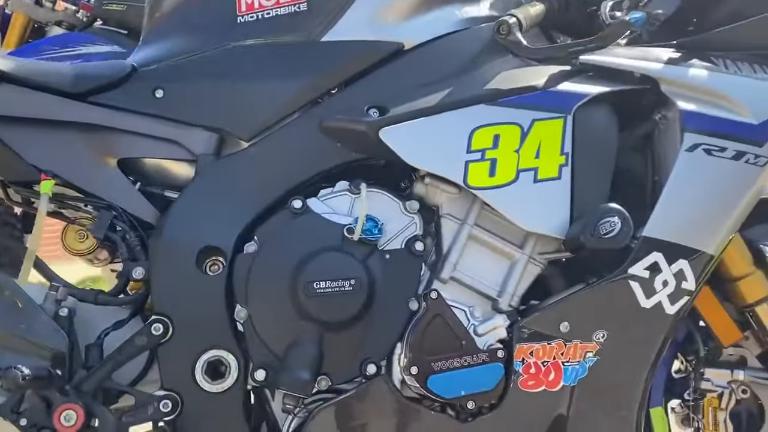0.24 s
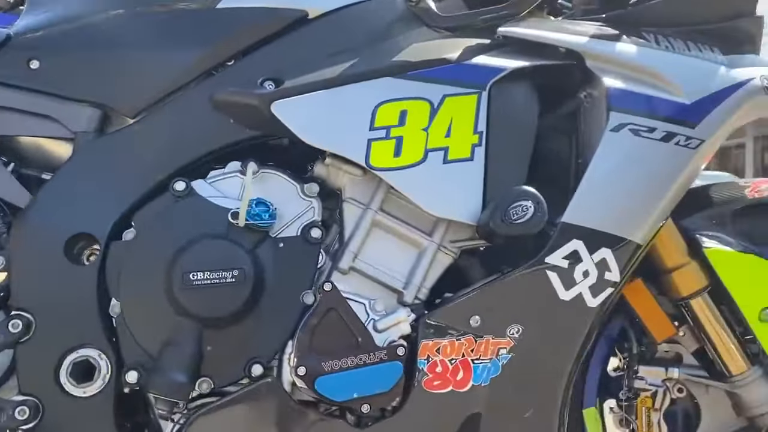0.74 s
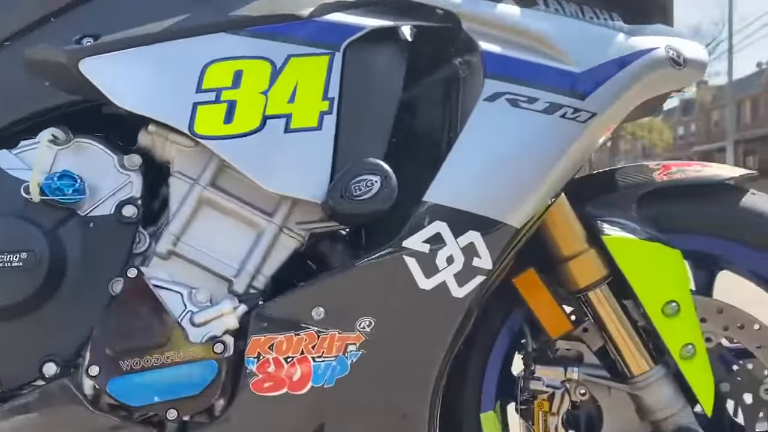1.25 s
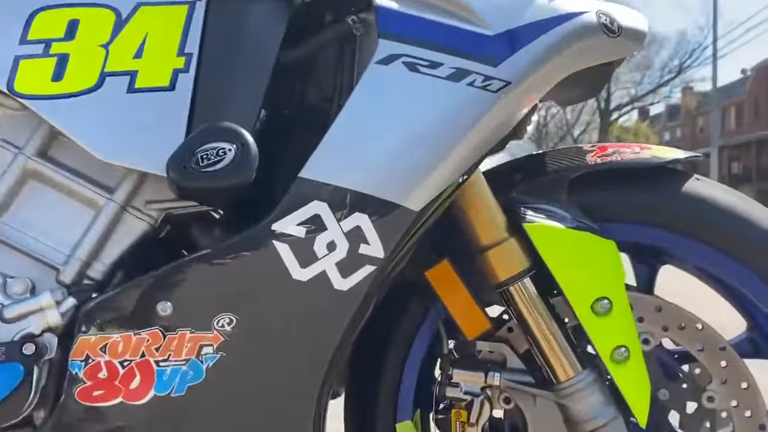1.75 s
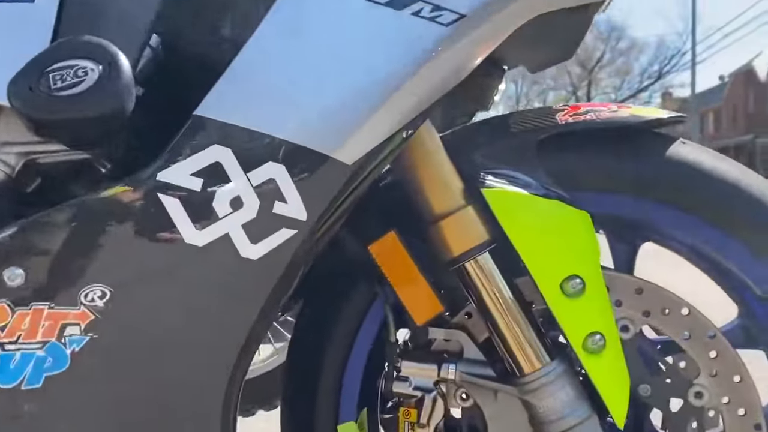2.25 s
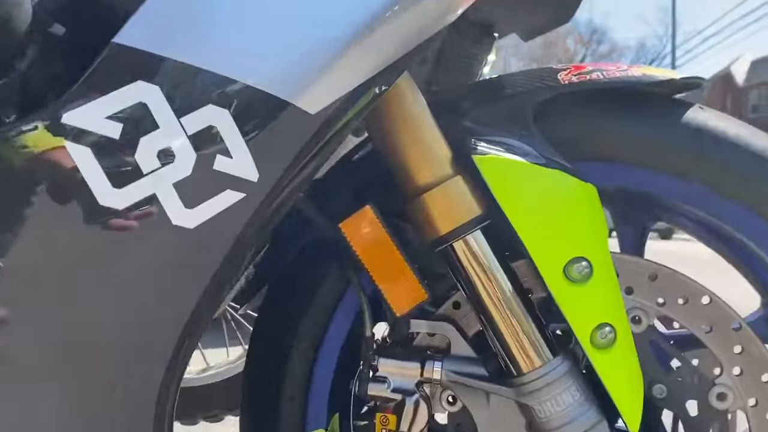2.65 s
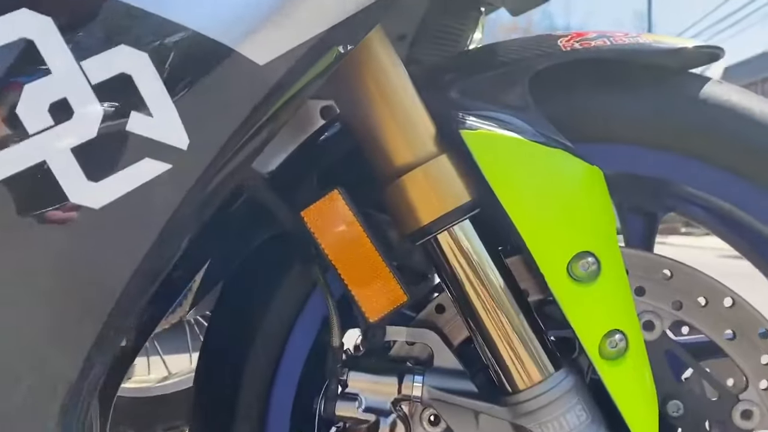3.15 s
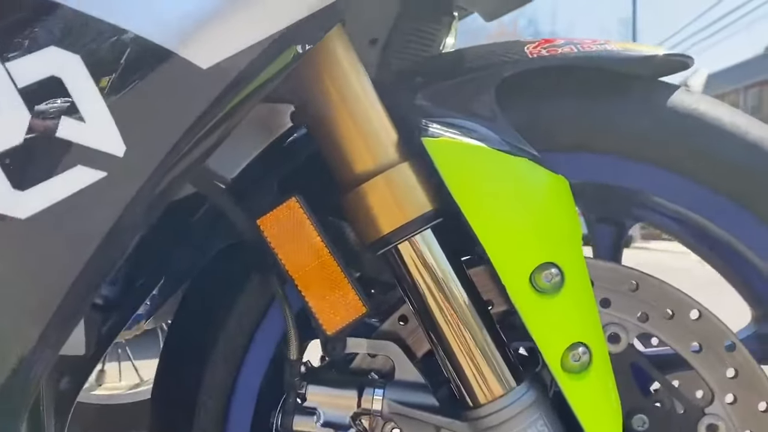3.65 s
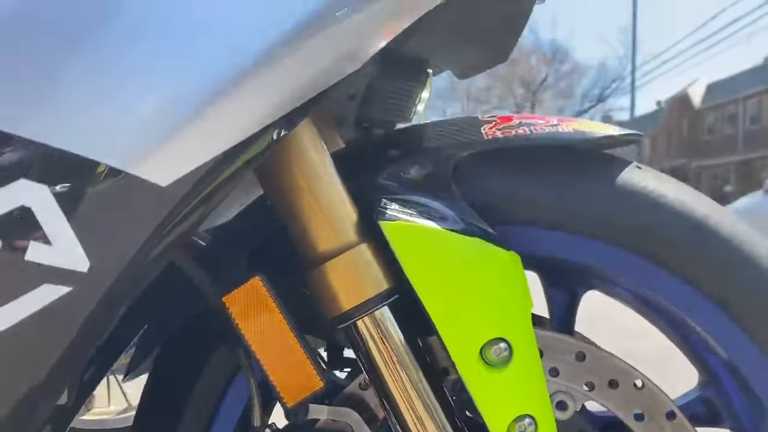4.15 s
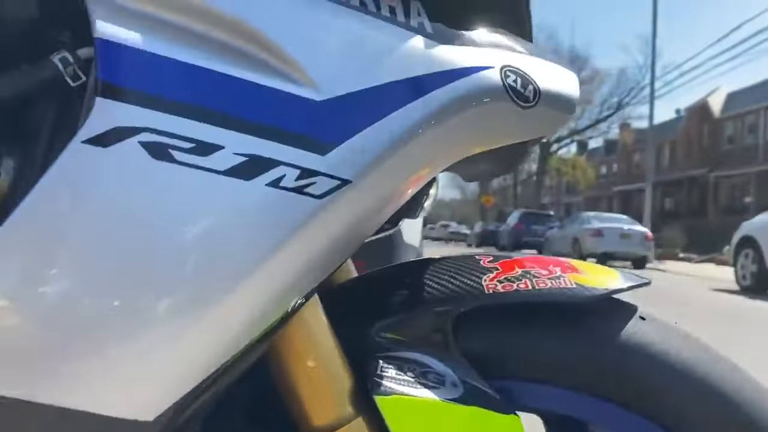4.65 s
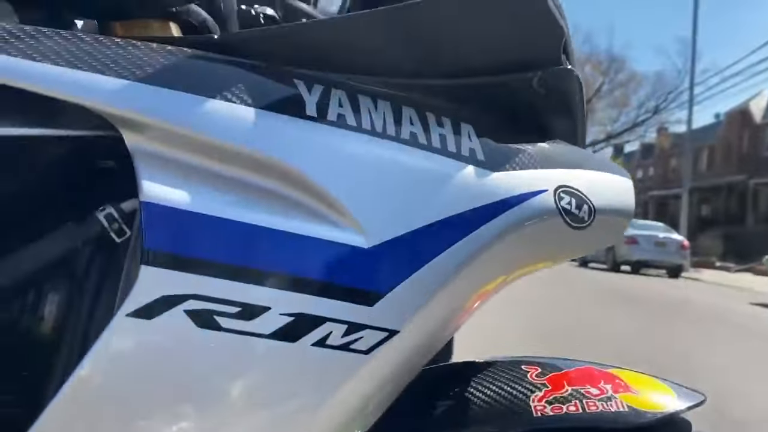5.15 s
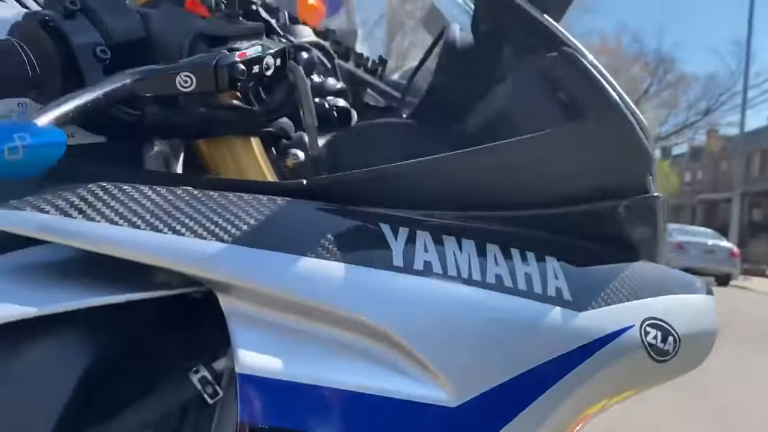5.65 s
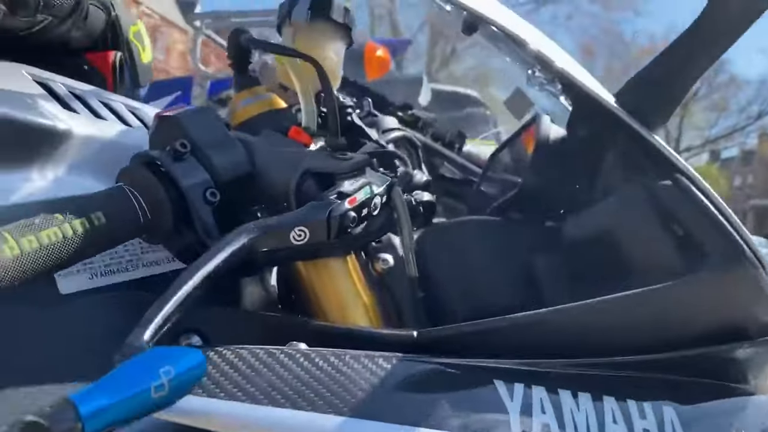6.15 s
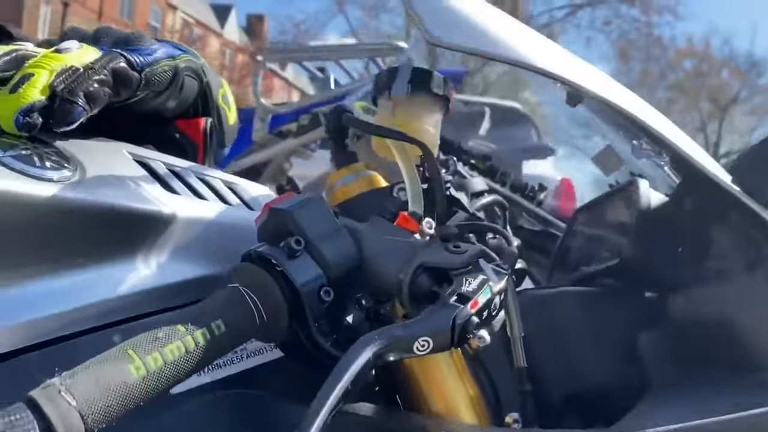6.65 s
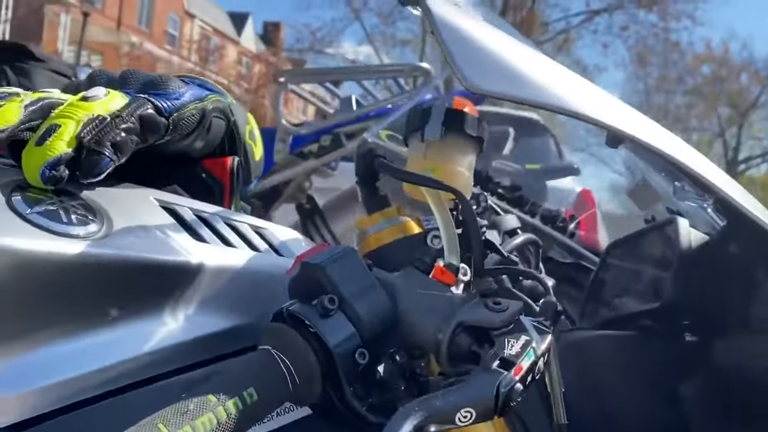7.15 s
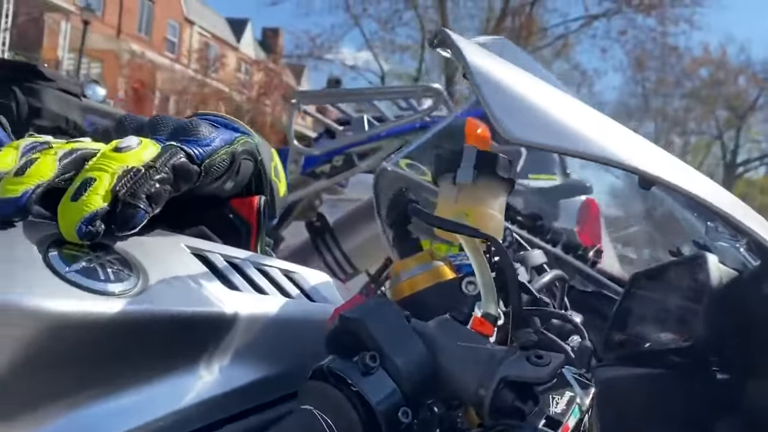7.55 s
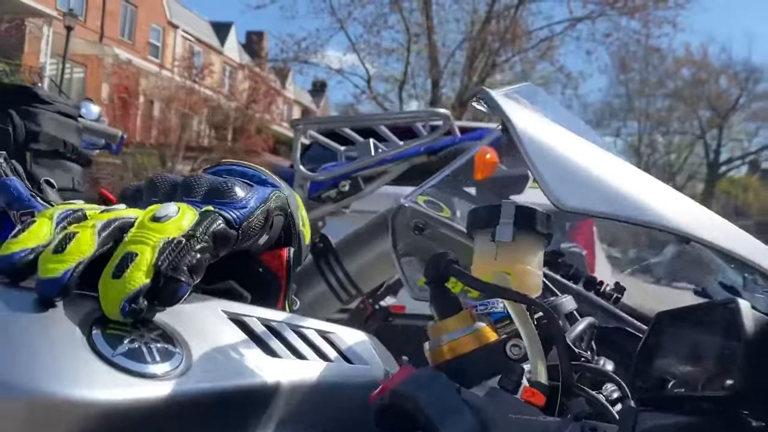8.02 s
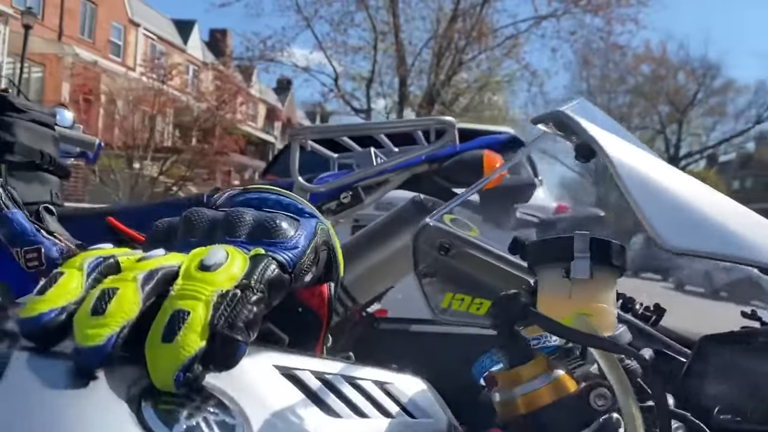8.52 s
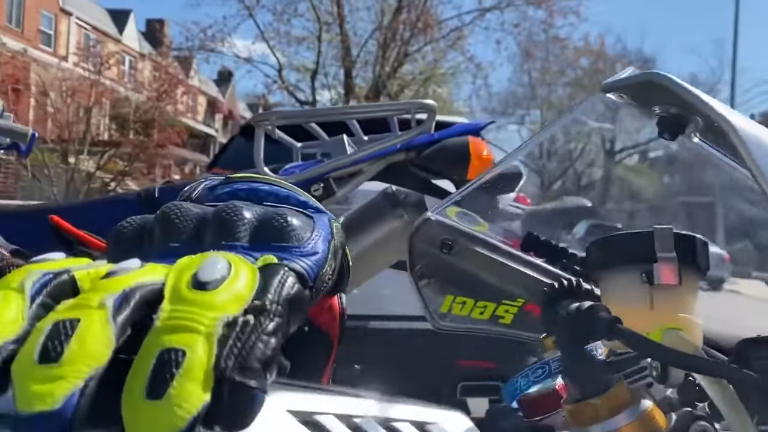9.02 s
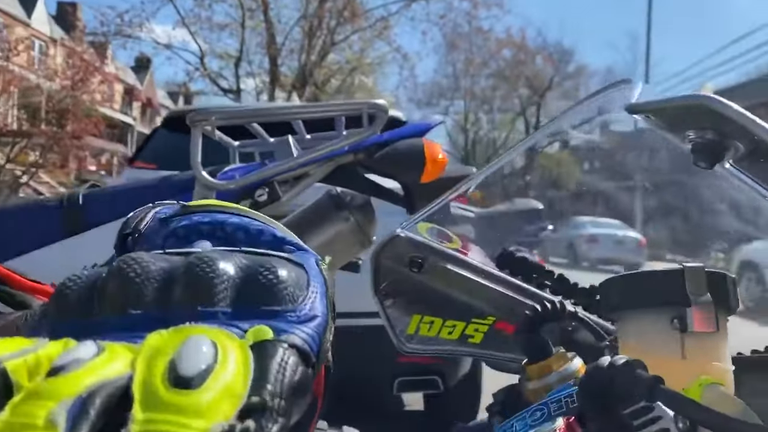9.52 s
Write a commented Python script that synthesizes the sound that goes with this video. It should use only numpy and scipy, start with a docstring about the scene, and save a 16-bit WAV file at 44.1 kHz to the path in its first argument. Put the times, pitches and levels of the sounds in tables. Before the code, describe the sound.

Close up, an uneven four-cylinder motorcycle engine thumps and barks at idle, revving in seven short, sharp blips over hissing intake and metallic clatter.

```python
"""On a driveway, a crossplane four-cylinder sport motorcycle warms up: a lumpy idle, a throttle blip every 1.4 s.
Each blip snaps open, cuts the fuel, relights briefly and coasts back to idle. Uneven firings ring the exhaust as
thump and bark over a low boom; the intake hisses with every stroke and whistles; the valve gear rings the cases,
a gear whines, loose parts clack, and there are short bright bursts of treble noise. The microphone pair moves from
beside the engine, past the front wheel, up to the cockpit and the tank; faint echoes come back from the street."""
import sys
import numpy as np
from scipy import signal
from scipy.fft import rfft, irfft, next_fast_len
from scipy.io import wavfile
from scipy.ndimage import uniform_filter1d, minimum_filter1d

SR = 44100
rng = np.random.default_rng(int(sys.argv[2]) if len(sys.argv) > 2 else 0)


def master_out(mix):
    """Clip the mix to full scale and print it as 16-bit PCM to the path in sys.argv[1]."""
    frames = np.transpose(np.atleast_2d(mix))
    ceiling = np.clip(frames, -1, 1)
    pcm = np.round(ceiling * 32767).astype(np.int16)
    wavfile.write(sys.argv[1], SR, pcm)


N = 431298
TIME = np.arange(N) / SR  # s
BINS = np.fft.rfftfreq(N, 1 / SR)  # Hz
IDLE_RPM = 1690

# throttle blips: (time [s], top speed [rpm], idle that follows [rpm], throttle opening [factor],
# relight strength [factor], delay of the relight [s], extra thump [dB], extra intake noise [dB])
BLIPS = [(0.476, 3387, 1692, 1.21, 1.3, 0.2054, 2, 2.5), (1.875, 3550, 1730, 1.08, 0.71, 0.15, 4, 2.5),
         (3.275, 3587, 1714, 0.75, 0.87, 0.15, 3.5, 3.5), (4.676, 3406, 1725, 0.94, 1.56, 0.21, 3.5, 2.5),
         (6.074, 3618, 1709, 0.97, 1.11, .178, 2.5, 2), (7.475, 3457, 1730, 1.14, 0.95, 0.17, 0.5, 1),
         (8.875, 3367, 1717, 1.19, 1.5, 0.23, 2, 1)]
# firings that stand out, at idle or on the way down:
# (time heard [s], thump [dB], bark [dB], change of the burns that follow [dB])
MARKED_FIRINGS = [(0.238, 5.5, 10, -4), (0.684, 7, 14.5, 2), (0.834, 10.5, 18.5, -4), (0.853, 9.5, 5, -6),
                  (0.921, 8.5, 7, -2.5), (1.118, 7, 6, -1), (1.328, 4, 9, -5), (1.541, 8, 11.5, -2),
                  (1.774, 6, 13.5, 0), (1.822, 6.5, 9, -9), (2.089, 9, 0, 3), (2.208, 10.5, -13, 0.5),
                  (2.261, 10.5, 9, 0.5), (2.462, 3, 5, 0), (2.53, 8, 7, -9.5), (2.669, 3, -2, 2),
                  (2.74, 3, 13, -3), (2.944, 5, 10, -10), (3.157, 1.5, 3, -12), (3.483, 1, 11, 4.5),
                  (3.609, 9, 4, 1), (3.662, 9.5, 1, 0.5), (3.997, 2, -1, -1.5), (4.132, -2, 4, -1.5),
                  (4.273, 4.5, 4, -2), (4.481, 8, 8, -1), (5.069, 9.5, 10, 1), (5.111, 6, 6.5, -1),
                  (5.28, 5, 8, 0.5), (5.758, 6.5, 3, -3), (5.972, 2, -0.5, 1), (6.419, 6, 8.5, -5),
                  (6.475, 3, 10, 0), (6.74, 2, 4, -2.5), (6.807, -7, 2, -4), (7.016, -3, 5, -3),
                  (7.106, 2, 4, -2.5), (7.23, 6, 2, -1), (7.441, 1.5, 5, 4), (7.709, 9, -7, -0.5),
                  (7.823, 6, 17, 2), (7.897, 4, 11, 1), (8.089, 6.5, 7, 2.5), (8.156, 5.5, 8, -0.5),
                  (8.318, 5.5, 10, 4.5), (8.571, -8, -5, 2), (8.646, 7.5, 11, -2.5), (8.805, 5, 12, 2.5),
                  (9.083, 13, 15, 1), (9.246, 5, 10, -3), (9.351, 5.5, 5, -2), (9.44, 2, -4, 0),
                  (9.514, 5, 5, -5)]
# relative levels along the microphones' way:
# (time [s], thump [dB], bark [dB], intake rasp and gear noise [dB], intake hiss [dB])
NEARNESS = [(0, -12.5, -26.5, -30, -41), (1.2, -15.5, -29.5, -30.5, -42), (2.6, -15.5, -29.5, -32, -40),
            (3.5, -12.5, -26.5, -28, -37.5), (4.3, -17.5, -30, -32.5, -41), (5.5, -17, -24.5, -32, -42),
            (6.9, -15.5, -24, -33.5, -44), (8.3, -20, -28.5, -35.5, -51.5), (9.15, -17, -27, -33.5, -55.5),
            (9.78, -19, -26, -37, -50.5)]
# colour of the intake hiss and of the bright bursts: (frequency [Hz], level [dB per Hz])
HISS_COLOUR = [(2500, -27), (4500, -4.5), (6000, -2.5), (7200, 5), (8500, 6.5), (11500, 5), (13300, 5.5),
               (14400, 3.5), (15500, 8), (17000, -32)]


def speed():
    """Crank speed in rpm: every blip spins it up the same way and leaves it at a slightly different idle."""
    # up, down and a dip under idle: (time after opening [s], share of the way from idle to top speed)
    spin = [(-.005, 0), (.075, .58), (.145, 1), (.225, .92), (.325, .46), (.425, .135), (.525, -.05),
            (.6, 0)]
    rpm = np.full(N, float(IDLE_RPM))
    for start_s, top, idle, *_ in BLIPS:
        blip_rpm = idle + (top - idle) * np.interp(TIME - start_s, *np.transpose(spin))
        rpm = np.where(TIME > start_s + spin[0][0], blip_rpm, rpm)
    return rpm


def running(rpm, cut_s=0.14, relight_end_s=0.238, coast_end_s=0.522):
    """Engine state: throttle open, relight after the fuel cut, coasting down, and revs in octaves above idle."""
    throttle = relight = coast = 0
    for s, _, _, opening, strength, delay_s, *_ in BLIPS:
        throttle = throttle + opening * opened(s, attack_s=0.01, end_s=s + cut_s, release_s=0.026)
        burst = opened(s + delay_s, attack_s=0.001, end_s=s + relight_end_s, release_s=0.0077)
        relight = relight + strength * burst
        coast = coast + opened(s + relight_end_s, attack_s=0.018, end_s=s + coast_end_s, release_s=0.027)
    return throttle, relight, coast, np.log2(rpm / IDLE_RPM)


def opened(start_s, attack_s, end_s, release_s):
    """One stage of a blip as an envelope."""
    return np.interp(TIME, [start_s, start_s + attack_s, end_s, end_s + release_s], [0, 1, 1, 0])


def effort(state, throttle_db, relight_db, coast_db, revs_db, pull_db=0):
    """Gain of a source over its idle level; pull is what the revs add only while the throttle is open."""
    throttle, relight, coast, revs = state
    pulling_db = throttle * (throttle_db + pull_db * revs)
    return amp(pulling_db + relight * relight_db + coast * coast_db + revs * revs_db)


def blipped(axis, attack_s=0.0088, hold_s=0.2, release_s=0.087):
    """Gain that each blip adds to one source."""
    return amp(sum(row[axis] * opened(row[0], attack_s, row[0] + hold_s, release_s) for row in BLIPS))


def firings(crank, rpm, scatter_db=1.84, cycle_db=1.18, jitter_s=0.00038, ring_up_s=0.0018,
            gust_scatter_db=3, evenness=0.81, gust_share=0.84, full_burn=1.0, ragged_db=1):
    """Times and thump, bark and hiss sizes of all firings: erratic burns at idle even out as the revs rise."""
    # a row a cylinder, about 180-90-180-270 degrees apart:
    # (crank angle [degrees of 720], push at idle [dB], hiss [dB])
    cylinders = [(111, 3.5, -5), (277.1, -0.5, -10), (353.7, 3.5, -3.5), (570.8, 3, -3)]
    angle, push_db, hiss_db = np.tile(cylinders, (int(crank[-1]) + 1, 1)).T
    cycle = np.arange(len(angle)) // len(cylinders)
    times = np.interp(cycle + angle / 720, crank, TIME, left=.004, right=TIME[-1] + 1)
    slowness = IDLE_RPM / np.interp(times, TIME, rpm)
    chance = rng.standard_normal((5, len(times)))
    burn, early, gust, mixture = chance[:4] * slowness ** 2
    burn, mixture = np.minimum([burn, mixture], full_burn)  # a burn can fall far short, but hardly overshoot
    times = times + jitter_s * early
    # the nearest firing moves to each marked time, less the time the pipe takes to ring up
    at, thump_db, bark_db, _ = np.transpose(MARKED_FIRINGS)
    marked = abs(times - at[:, None]).argmin(1)
    times[marked] = at - ring_up_s
    swing_db = lope(times) + cycle_db * mixture[cycle * len(cylinders)]
    push_db = push_db * slowness + scatter_db * burn + swing_db
    front_db = evenness * push_db + ragged_db * np.minimum(chance[4], 1)
    push_db[marked], front_db[marked] = thump_db, bark_db
    draw_db = hiss_db + gust_scatter_db * np.minimum(gust, 1) + gust_share * swing_db
    return times, amp(push_db), amp(front_db), amp(draw_db)


def lope(times, build_db=4.0, build_s=0.012, after_s=0.069, stumble_s=.028):
    """Extra dB of each firing: burns build up to a marked one and change after it; the idle stumbles."""
    # brief changes of the idle, most of them dips where a burn nearly fails: (time [s], change [dB])
    stumbles = [(0.055, 0), (0.195, -3), (0.345, -3), (0.662, 0), (1.0, -7), (1.15, -6), (1.495, 3),
                (1.85, -9), (2.417, -7), (2.779, -9), (3.045, -9), (3.2, 4), (3.729, -5.5), (4.1, -2),
                (4.51, -8), (4.98, 1), (5.165, -6), (5.585, -6), (5.865, -3.5), (6.0, -2), (6.39, -7),
                (6.625, -11), (7.955, -7), (8.215, 0.5), (9.331, -9)]
    db = np.zeros(len(times))
    for s, _, _, after_db in MARKED_FIRINGS:
        since = times - s
        db += build_db * np.interp(since, [-1.5 * build_s, -build_s / 2, 0], [0, 1, 1], right=0)
        db += after_db * np.interp(since, [0, .75 * after_s, after_s], [1, 1, 0], left=0)
    for s, change_db in stumbles:
        db += change_db * np.interp((times - s) / stumble_s, [-1, -.5, .25, .5], [0, 1, 1, 0])
    return db


def thump(times, push, state, level_db=1, crack_lead_s=0.00746, crack_db=-12, sweep_s=.006, pipe_hz=140,
          flutter=.024, flutter_s=.01):
    """A small push as a valve cracks open, then the main one, ring the pipe; the gas flutters behind them."""
    # pipe colours from each place: (frequency [Hz], level [dB per Hz])
    pipe_by_engine = [(30, -48.5), (50, 4.5), (70, 0), (95, -0.5), (120, 0.5), (165, 5.5), (200, -2),
                      (260, -1), (310, -6.5), (385, -14), (470, -38.5), (900, -50)]
    pipe_by_wheel = [(30, -59), (50, -12), (70, 0.5), (95, -6), (120, 1), (135, -1.5), (153, 5), (175, 0),
                     (205, -4.5), (260, -1), (315, -16.5), (400, -38), (500, -41), (900, -78)]
    pipe_by_cockpit = [(30, -74), (50, 9), (70, -1.5), (95, 1.5), (120, 1), (175, -0.5), (215, -8),
                       (290, 3), (335, -5.5), (400, -13), (500, -37.5), (900, -54)]
    pipe_by_tank = [(30, -74), (50, 1), (70, 5), (95, 1.5), (120, 0.5), (175, 2), (205, -8.5), (272, 4.5),
                    (305, 2.5), (340, -8.5), (400, -15), (500, -29), (900, -64)]
    load = effort(state, throttle_db=4.0, relight_db=6.0, coast_db=-0.5, revs_db=-9.0, pull_db=6.0)
    push = push * np.interp(times, TIME, load)
    main = clicks(times, push)
    revs = state[3]
    lead_s = crack_lead_s / 2 ** np.interp(times, TIME, revs)
    crack = clicks(times - lead_s, push * amp(crack_db) * rng.uniform(0.02, 1.0, len(times)))
    gas = flutter * puffs(main, flutter_s) * rng.standard_normal(N) / 2
    drive = -main - crack + gas
    # the silencer holds back the bass, so each beat falls in pitch
    advance_s = sweep_s * np.log(np.clip(BINS, 60, 400) / pipe_hz)
    turns = np.cumsum(advance_s) * BINS[1]
    turns = turns - np.interp(pipe_hz, BINS, turns)
    drive = irfft(rfft(drive) * np.exp(2j * np.pi * turns), N)
    heard = walked(drive, [pipe_by_engine, pipe_by_wheel, pipe_by_cockpit, pipe_by_tank])
    return amp(curve(NEARNESS, axis=1) + level_db) * blipped(axis=6) * heard


def bark(times, front, state, level_db=4.0, wake=.021, wake_s=.016):
    """Steep pressure fronts and their short turbulent wake excite the upper pipe resonances."""
    # upper pipe colours from each place: (frequency [Hz], level [dB per Hz])
    bark_by_engine = [(200, -29.5), (330, 8.5), (430, -2), (510, 1), (600, 1.5), (720, -2), (850, -9.5),
                      (1080, -15), (1300, -31), (1600, -43), (3000, -44)]
    bark_by_wheel = [(200, -37), (330, 10), (425, 4), (500, 3.5), (600, 8), (710, -2), (760, -4.5),
                     (820, -3.5), (900, -24), (1100, -14), (1600, -41), (3000, -33)]
    bark_by_cockpit = [(200, -37), (330, 2), (385, 6), (430, 9), (490, -1.5), (600, -5), (720, -0.5),
                       (850, -13), (1100, -22), (1600, -24), (3000, -45)]
    load = effort(state, throttle_db=7, relight_db=10.0, coast_db=-1, revs_db=-2.5, pull_db=10.5)
    fronts = clicks(times, front * np.interp(times, TIME, load))
    drive = -fronts + wake * puffs(fronts, wake_s) * turbulence()
    heard = walked(drive, [bark_by_engine, bark_by_wheel, bark_by_cockpit])
    return amp(curve(NEARNESS, axis=2) + level_db) * heard


def boom(crank, state, level_db=-26, waver_db=3):
    """The uneven firing order leaves a clean low beat, three to a cycle, that wavers in strength."""
    gain = amp(level_db + waver_db * np.tanh(wander(rate_hz=14.0)))
    gain = gain * effort(state, throttle_db=7.5, relight_db=9.0, coast_db=-2.5, revs_db=-15.5)
    return gain * np.sqrt(2) * np.cos(2 * np.pi * 3 * crank)


def stroking(times, draw, lead_s=0.017, stroke_s=0.022, open_s=0.0036):
    """The load of each stroke swells and dies away; its mean is 1."""
    strokes = puffs(puffs(clicks(times - lead_s, draw), stroke_s), open_s)
    return strokes / strokes.mean()


def intake(strokes, state, graininess=0.11, grains_per_s=500, flicker_db=3.5, rasp_flow=.8, hiss_flow=.3):
    """Air tears past the throttles on every stroke, over a steady flow; the hiss is grainy and flickers."""
    # rasp colours from each place: (frequency [Hz], level [dB per Hz])
    rasp_by_engine = [(500, 6), (950, 7.5), (1200, 3), (1650, 0.5), (2250, 1), (2620, 0.5), (2780, -2),
                      (3050, 3), (4000, -4), (5000, -6.5), (6500, -10.5), (14000, -19)]
    rasp_by_wheel = [(500, 7.5), (900, 2.5), (1200, -4), (1650, -1), (2250, -1), (2620, 4), (2780, -7),
                     (3200, -5.5), (4000, -4.5), (5000, -7.5), (6500, -13), (14000, -37)]
    rasp_by_cockpit = [(500, -2), (950, 6.5), (1200, 6), (1650, 2.5), (2250, 0.5), (2620, 4.5), (2780, -4),
                       (2930, 1.5), (4000, -4), (5000, -8), (6500, -13), (14000, -19.5)]
    grains = puffs((rng.random(N) < grains_per_s / SR) * rng.exponential(1, N), decay_s=0.00017)
    # the steady flows are shares of the mean stroke
    rasp = walked((rasp_flow + strokes) * turbulence(), [rasp_by_engine, rasp_by_wheel, rasp_by_cockpit])
    hiss = evened(colour((hiss_flow + strokes) * (1 + graininess * grains) * turbulence(), HISS_COLOUR))
    hiss = hiss * amp(flicker_db * np.minimum(wander(rate_hz=49), 1))
    rasp_load = effort(state, throttle_db=7.0, relight_db=0.5, coast_db=-1.5, revs_db=-2, pull_db=0.5)
    hiss_load = effort(state, throttle_db=9.0, relight_db=2.5, coast_db=-1.5, revs_db=-8.5, pull_db=2.5)
    rasp = amp(curve(NEARNESS, axis=3)) * rasp_load * rasp
    hiss = amp(curve(NEARNESS, axis=4)) * hiss_load * hiss
    return blipped(axis=7) * (rasp + hiss)


def cases(crank, strokes, state, whirr=0.69, load_share=0.34, tap_s=0.0013, scatter_db=4,
          flicker_db=1.63, waver_hz=12, taps_per_cycle=16):
    """Valve gear taps and gear whirr ring the cases, harder on every stroke; modes waver in level and pitch."""
    # modes of the cases: (frequency [Hz], width [Hz], relative level [dB])
    case_modes = [(1398, 114, -10), (1936, 340, -0.5), (2900, 100, -4), (3250, 400, -13), (1267, 250, -11)]
    # how clearly each mode reaches the microphones: (time [s], then the relative level of each mode [dB])
    case_nearness = [(0, -26, -38, -40, -50, -42), (.72, -22, -29.5, -37, -42, -43),
                     (1.05, -26.5, -38.5, -44, -57, -36), (1.6, -25.5, -47, -36, -37, -53),
                     (2.8, -30, -42, -41, -33, -36), (4.4, -30, -42, -38, -35, -27.5),
                     (5.4, -33, -43, -44, -66, -33), (7, -26.5, -42, -39, -48, -26.5),
                     (8.4, -27.5, -41, -41, -46, -38), (9.78, -25.5, -37.5, -46, -58, -24)]
    at = TIME[1:][np.diff(np.floor(crank * taps_per_cycle)) > 0]
    taps = puffs(clicks(at, amp(scatter_db * np.minimum(rng.standard_normal(len(at)), 1))), tap_s)
    drive = rfft((whirr + taps) * (1 + load_share * strokes) * turbulence())
    out = 0
    for k, (hz, width, db) in enumerate(case_modes):
        waver = np.exp(2j * np.pi * np.cumsum(waver_hz * wander(rate_hz=6)) / SR)
        ring = (np.fft.ifft(drive / (1 + 2j * (BINS - hz) / width) ** 2, N) * waver).real
        gain = amp(curve(case_nearness, axis=k + 1) + db + flicker_db * wander(rate_hz=7.0))
        out = out + gain * evened(ring)
    return out * effort(state, throttle_db=5, relight_db=2.5, coast_db=0.5, revs_db=-11.5)


def whine(crank, state, teeth=51, level_db=2, spread_hz=230, flicker_db=3, ring_hz=2950, width_hz=600):
    """A gear mesh, roughened by backlash, sings out when the revs carry it up to a resonance of the cover."""
    rattle = wander(rate_hz=spread_hz) + 1j * wander(rate_hz=spread_hz)
    mesh = (rattle * np.exp(2j * np.pi * teeth * 2 * crank)).real / 2  # two turns a cycle
    mesh = mesh * amp(flicker_db * wander(rate_hz=63))
    ring = irfft(rfft(mesh) / (1 + 2j * (BINS - ring_hz) / width_hz) ** 2, N)
    load = effort(state, throttle_db=-1.0, relight_db=-5.0, coast_db=-2.0, revs_db=3.0)
    return amp(curve(NEARNESS, axis=3) + level_db) * load * ring


def ticks(times, draw, level_db=-9, scatter_db=3.0, lead_s=.013, spread_s=.022, count=5):
    """Every firing jolts the gear train through its slack: each loose part gives a few metallic clacks."""
    # loose parts of the gear train: (frequency [Hz], width [Hz], relative level [dB])
    clack_modes = [(1100, 460, -8.5), (1675, 450, -14), (2410, 400, -9.5), (2620, 210, -5),
                   (3134, 390, -4.5), (3630, 820, -8), (5130, 500, -15)]
    out = 0
    for hz, width, db in clack_modes:
        at = np.repeat(times, count) - lead_s + spread_s * rng.random(len(times) * count)
        sizes = np.repeat(draw, count) * amp(scatter_db * np.clip(rng.standard_normal(len(at)), -2, 1))
        sides = rng.choice([-1, 1], len(at)) * rng.uniform(0, 1, (2, len(at)))  # uneven left and right
        taps = np.array([clicks(at, sizes * side) for side in sides])
        ring = irfft(rfft(taps) / (1 + 2j * (BINS - hz) / width) ** 2, N)
        out = out + amp(db) * evened(ring)
    return amp(curve(NEARNESS, axis=3) + level_db) * out


def whistles(attack_s=0.017, hold_s=0.068, release_s=0.12, spread_hz=300):
    """The fast engine sucks air through the gap of the shut throttles: a breathy whistle."""
    # one after each blip: (time [s], frequency [Hz], level [dB])
    whistle_rows = [(.65, 6000, -42), (2.07, 6140, -48), (3.47, 6460, -46), (4.869, 6700, -70),
                    (6.213, 6800, -43), (7.66, 7000, -53), (9.06, 6850, -60)]
    breath = wander(rate_hz=spread_hz) + 1j * wander(rate_hz=spread_hz)
    corners = np.cumsum([0, attack_s, hold_s, release_s])
    out = np.zeros((2, N))
    for s, hz, db in whistle_rows:
        on = (TIME > s) & (TIME < s + corners[-1])
        swell = amp(db) * np.interp(TIME[on] - s, corners, [0, 1, 1, 0])
        out[:, on] += swell * (breath[on] * np.exp(2j * np.pi * hz * TIME[on])).real
    return out


def bright_bursts(level_db=-5, decay_s=0.0042):
    """Short bright bursts of treble noise: each starts at once and dies away."""
    # (time [s], relative level [dB])
    burst_rows = [(0.0933, -22), (0.162, -22), (0.3009, -34), (0.4855, -30), (0.9649, -24), (1.0143, -30),
                  (1.035, -21), (1.6463, -35), (1.8808, -29), (2.3008, -32), (2.655, -24), (2.7897, -37),
                  (2.9958, -26), (3.2596, -39), (3.2886, -23), (3.8907, -33), (4.1716, -42), (4.3801, -33),
                  (6.0777, -25), (7.2226, -39)]
    at, db = np.transpose(burst_rows)
    return puffs(clicks(at, amp(db + level_db)), decay_s) * evened(colour(turbulence(), HISS_COLOUR))


def street(x, t60=0.45, wet_db=-21.0, size=16000, count=500):
    """Scattered echoes from house fronts and parked cars."""
    at = rng.integers(size // 40, size, (2, count))  # delays in samples
    taps = np.zeros((2, size))
    np.put_along_axis(taps, at, rng.choice([-1, 1], at.shape) * amp(-60 * at / SR / t60), 1)
    taps /= np.linalg.norm(taps, axis=1, keepdims=True)
    return x + amp(wet_db) * signal.oaconvolve(x, taps, axes=1)[:, :N]


def walked(x, places):
    """The colour shifts from place to place as the microphones move along the machine."""
    # (time [s], place [0 engine, 1 front wheel, 2 cockpit, 3 tank]), held at the last place there is a colour for
    walk = [(0, 0.15), (2.2, 0.035), (3.4, 0.82), (4.8, 1.16), (6.2, 1.61), (8.2, 1.92), (9.3, 2.55),
            (9.78, 4)]
    place = np.clip(curve(walk), 0, len(places) - 1)
    out = 0
    for k, points in enumerate(places):
        out = out + np.maximum(1 - abs(place - k), 0) * evened(colour(x, points))
    return out


def turbulence():
    """White noise as two microphones hear it, partly alike."""
    # (frequency [Hz], likeness of the two sides [0-1])
    likeness = [(300, 0.68), (650, 0.14), (1000, 0.056), (2000, 0.24), (3200, 1), (4500, 0.52), (5600, 0.2),
                (6400, 1), (16000, 1)]
    a, b = rfft(rng.standard_normal((2, N)))
    same = np.clip(read(likeness, BINS), 0, 1)
    return irfft(np.array([a, same * a + np.sqrt(1 - same ** 2) * b]), N)


def clicks(times, sizes):
    """A train of single pushes."""
    return np.bincount(np.clip(np.round(times * SR).astype(int), 0, N), sizes * (times > 0), N + 1)[:N]


def puffs(train, decay_s):
    """Each push starts a gust that dies away."""
    return signal.lfilter([1], [1, -np.exp(-1 / (decay_s * SR))], train)


def colour(x, points, size=8192):
    """Causal filter with the given spectrum: pushes ring after they land."""
    log_gain = np.log(amp(read(points, abs(np.fft.fftfreq(size, 1 / SR)))))
    ring = np.fft.ifft(np.exp(np.conj(signal.hilbert(log_gain)))).real[:size // 2]  # minimum phase
    return signal.oaconvolve(np.atleast_2d(x), ring[None], axes=1)[:, :N]


def wander(rate_hz, size=16):
    """A random drift of unit size, smooth above its rate."""
    steps = next_fast_len(N // size + 1)  # one step every few samples
    smooth = np.exp(-(np.fft.rfftfreq(steps, size / SR) / rate_hz) ** 2)
    drift = irfft(rfft(rng.standard_normal(steps)) * smooth, steps)
    return evened(np.interp(np.arange(N), np.arange(steps) * size, drift))


def evened(x):
    """Scales a sound to unit power."""
    return x / np.sqrt(np.mean(x ** 2) + 1e-20)


def amp(db):
    """Decibels to gain."""
    return 10 ** (np.asarray(db) / 20)


def curve(rows, axis=1):
    """One column of a time table at every sample."""
    rows = np.array(rows, float)
    return np.interp(TIME, rows[:, 0], rows[:, axis])


def read(points, hz):
    """A spectrum table on a log-frequency axis."""
    f, value = np.transpose(points)
    return np.interp(np.log(hz + 1), np.log(f + 1), value)


def scene():
    """One crankshaft and one throttle drive the engine's sources."""
    # the idle hunts, so the crank runs ahead and falls behind: (time [s], lead [degrees])
    hunt = [(0, 0), (.35, 28), (.5, 5), (.95, 15), (1.7, 40), (2.4, 30), (2.75, -20), (3.1, 0), (3.8, -10),
            (4, -32), (4.5, -15), (5.3, -28), (5.8, -5), (6.6, -12), (7, -42), (8.3, -50), (8.8, -85),
            (9.78, -88)]
    start_deg = 96  # of the 720 in a cycle
    rpm = speed()
    crank = (start_deg + curve(hunt)) / 720 + np.cumsum(rpm) / (2 * 60 * SR)  # in cycles of two turns
    state = running(rpm)
    times, push, front, draw = firings(crank, rpm)
    exhaust = thump(times, push, state) + bark(times, front, state)
    strokes = stroking(times, draw)
    air = intake(strokes, state) + whistles()
    metal = cases(crank, strokes, state) + whine(crank, state) + ticks(times, draw)
    return street(exhaust + air + metal + bright_bursts()) + boom(crank, state)


def record(dry):
    """The phone's stereo processing and microphones spread phase and level; then a limiter and band limit."""
    # (frequency [Hz], left minus right [dB])
    lean_points = [(50, 1.5), (140, 0.6), (260, 1), (500, 6), (1000, 4), (2000, 3), (4500, 5), (6400, 0.5),
                   (16000, -0.5)]
    # (frequency [Hz], phase by which left leads [radians])
    lead_points = [(30, 0.17), (90, 0.46), (170, 0.93), (280, 1.65), (450, 1.98), (750, 3.04), (1100, 2.25),
                   (1500, 1.94), (2100, 0.095), (3000, 1.12), (5000, 0.012)]
    # above 7 kHz the sides swing in and out of phase: (frequency [Hz], phase by which left leads [radians])
    treble_lead = [(7500, 0), (8500, -np.pi), (9500, -np.pi), (10400, -2 * np.pi), (11800, -2 * np.pi),
                   (12700, -3 * np.pi), (13600, -3 * np.pi), (14500, -4 * np.pi)]
    lean, lead = amp(read(lean_points, BINS) / 2), read(lead_points, BINS)
    left = lean * np.exp(.5j * lead)
    right = np.exp(-.5j * lead - 1j * read(treble_lead, BINS)) / lean
    wide = irfft(rfft(dry) * np.array([left, right]), N)
    allowed = 1 / np.maximum(abs(wide).max(0) / .95, 1)
    limited = wide * uniform_filter1d(minimum_filter1d(allowed, size=500), size=400)
    band = signal.firwin(511, 16050, window=("kaiser", 9), fs=SR)  # lowpass edge in Hz
    return signal.oaconvolve(limited, band[None], "same")


dry = scene()
out = record(dry)
master_out(out)
```